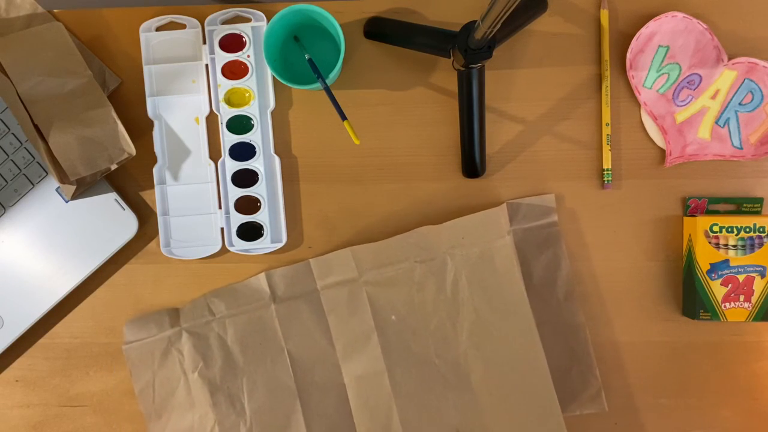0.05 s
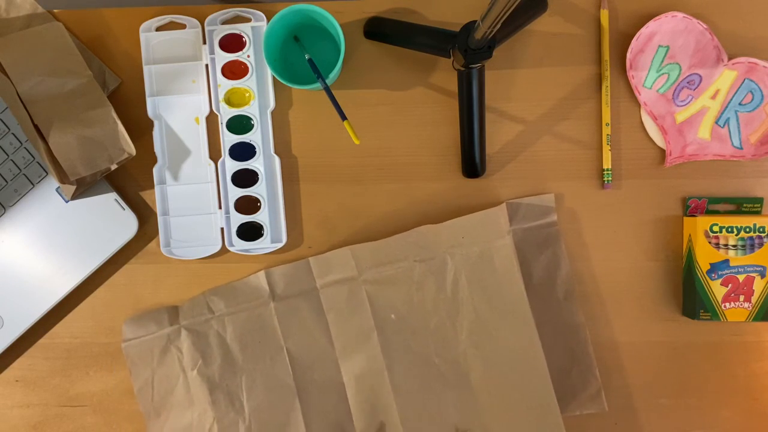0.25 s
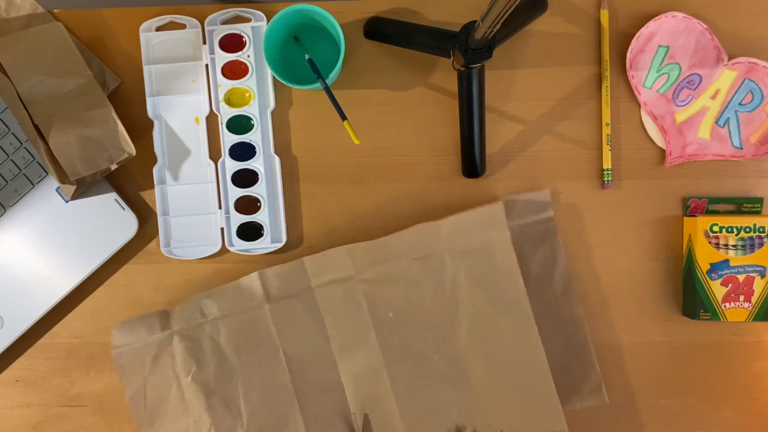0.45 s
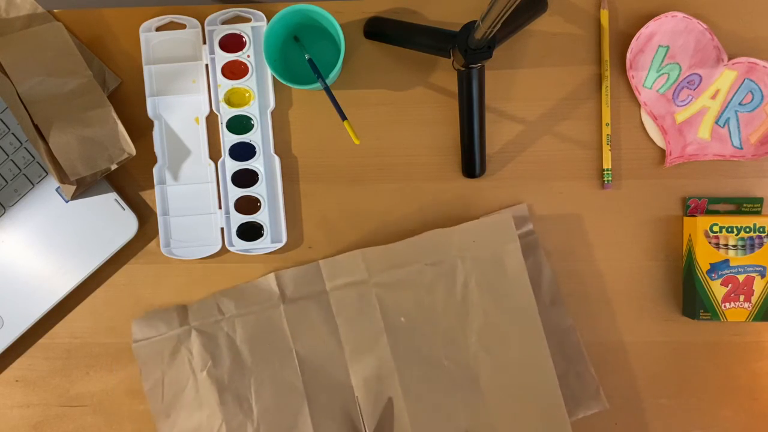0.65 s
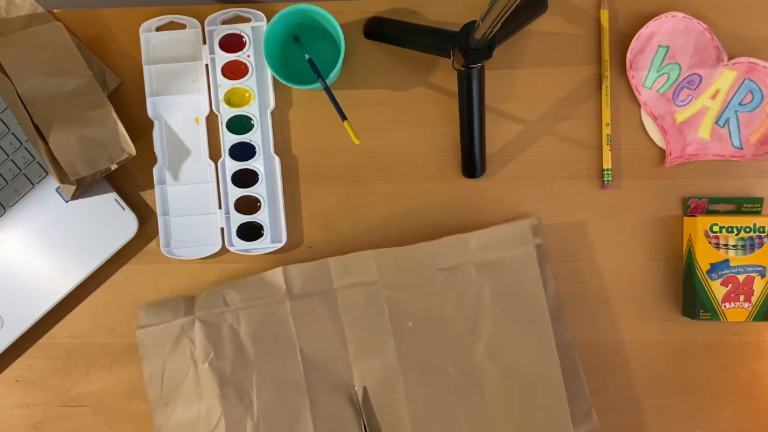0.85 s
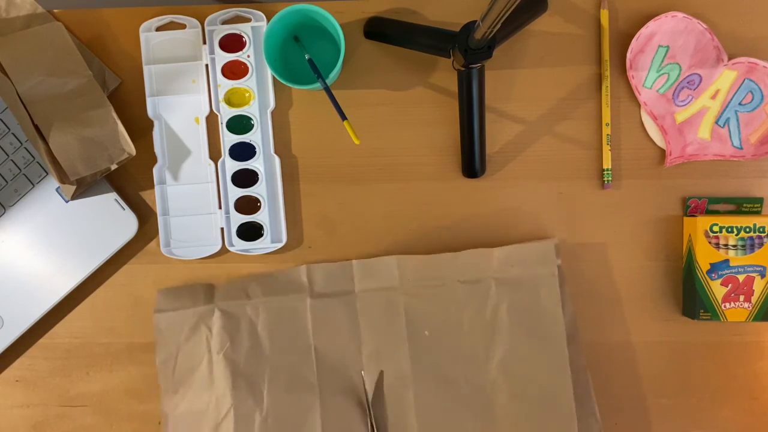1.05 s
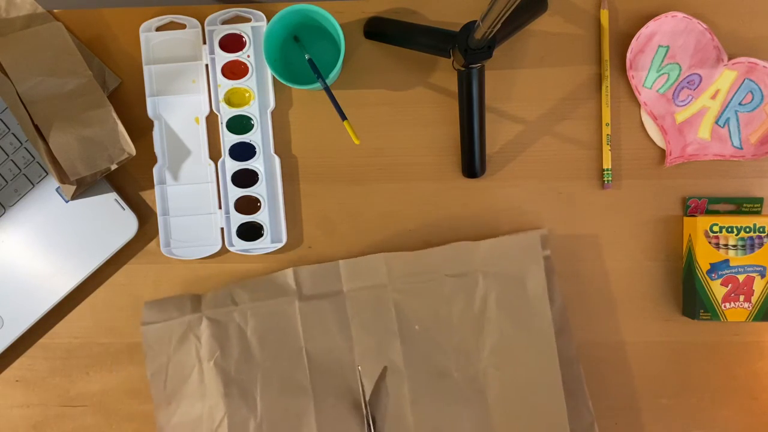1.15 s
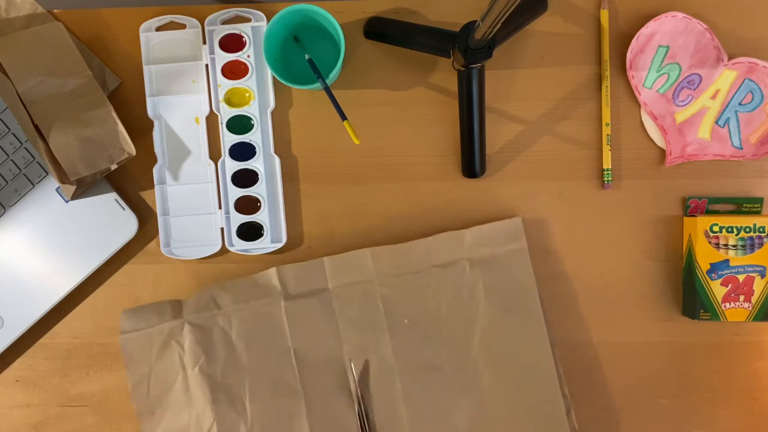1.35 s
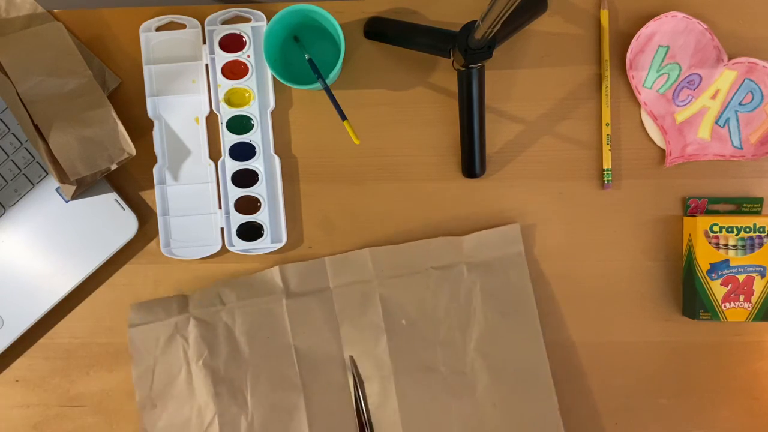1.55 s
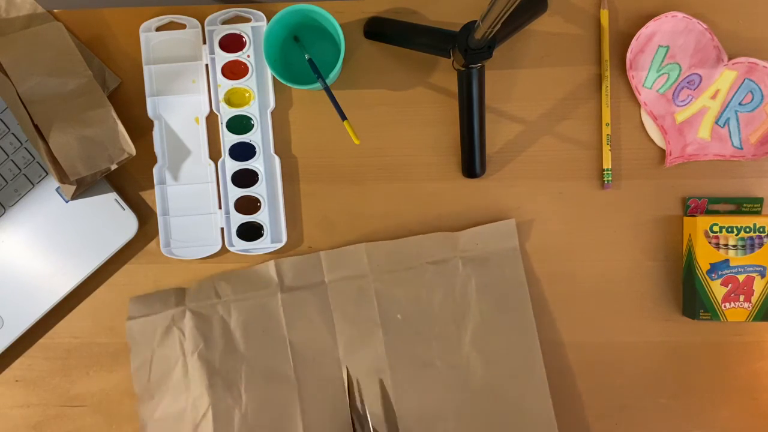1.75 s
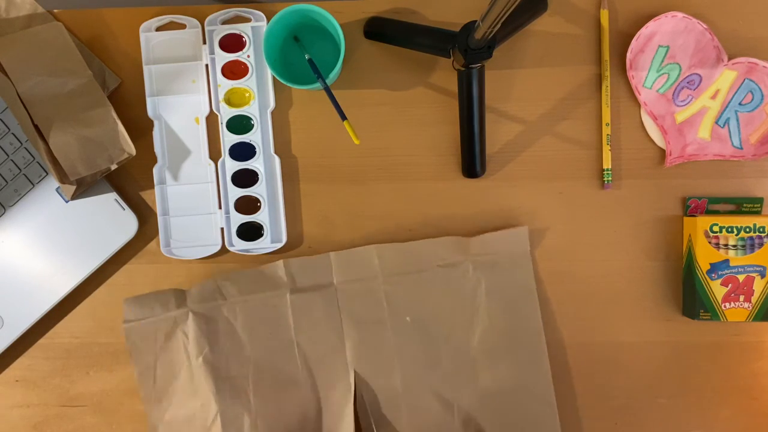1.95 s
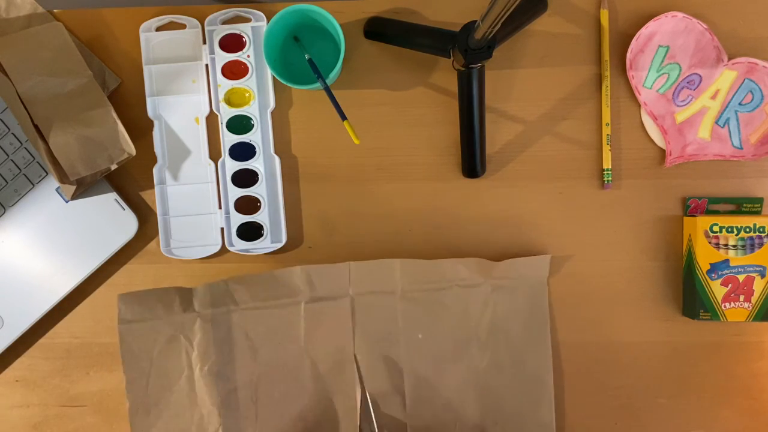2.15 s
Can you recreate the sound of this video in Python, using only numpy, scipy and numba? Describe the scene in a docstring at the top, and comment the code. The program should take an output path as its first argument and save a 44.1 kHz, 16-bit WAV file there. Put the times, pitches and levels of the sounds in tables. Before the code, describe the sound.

Crisp paper bag rustling in short strokes, followed by two scissor cuts, close in a quiet room

```python
"""A small quiet room with a wooden table, heard through two close microphone ports, over a faint low rumble.
A brown paper bag slides in five strokes by stick-slip friction, then shifts lightly in the hand.
Its creases snap by buckling, its flat sides pop, and the air inside resonates at about 1 kHz.
Scissors bite twice: fibres break one after another and the flap sinks in pitch; the steel blades tap.
The table hums under the rubbing and rings in a few low modes when the hand bumps it."""
import sys
import numpy as np
from scipy import signal
from scipy.fft import rfft, irfft, next_fast_len
from scipy.io import wavfile
from scipy.ndimage import uniform_filter1d, map_coordinates
from numba import njit

SR = 44100
rng = np.random.default_rng(int(sys.argv[2]) if len(sys.argv) > 2 else 0)


def waveform_to_disk(signal):
    """Save audio, clipped to [-1, 1], as 16-bit WAV at the path in sys.argv[1]."""
    frames = np.transpose(np.atleast_2d(signal))
    scaled = np.clip(frames, -1, 1) * 32767
    samples = np.round(scaled).astype(np.int16)
    wavfile.write(sys.argv[1], SR, samples)


N = 97020
T = np.arange(N) / SR
M = next_fast_len(N + SR // 2)  # padded transform length
HZ = np.fft.rfftfreq(M, 1 / SR)


def amp(db):
    """Level to amplitude ratio: 20 dB is a factor of ten."""
    return 10 ** (np.asarray(db) / 20)


def unit(x):
    """Normalization to an rms of 1."""
    return x / np.sqrt(np.mean(x ** 2) + 1e-20)


def along(points):
    """Logarithmic frequency interpolation of (Hz, value) points."""
    hz, value = np.transpose(points)
    return np.interp(np.log(HZ + 1), np.log(hz + 1), value)


def filtered(x, response):
    """Linear filtering: a product of spectra."""
    return irfft(rfft(x, M) * response, M)[..., :N]


def causal(gain):
    """Minimum phase: the folded cepstrum gives a causal response of unit power with this gain shape."""
    cepstrum = irfft(np.log(np.maximum(unit(gain), 1e-6)), M)
    cepstrum[1:M // 2] *= 2
    cepstrum[M // 2 + 1:] = 0
    return np.exp(rfft(cepstrum))


def colour(x, points):
    """Spectral envelope: shape x by relative (Hz, dB) points."""
    return filtered(x, causal(amp(along(points))))


def wobble(rate):
    """Random modulation: a smooth curve with rate knots a second."""
    return map_coordinates(rng.standard_normal(N // 8), [T * rate], mode="mirror")


def fade(t, t60):
    """Exponential damping: 60 dB down after t60 seconds."""
    return np.exp(-np.log(1000) * t / t60)


def signs():
    """Random polarity: two independent rows of plus and minus one."""
    return rng.choice([-1, 1], (2, N))


SLIP_SPREAD_DB, SHEET_T60_S, SHEET_RING = 5, 0.066, 1


def slips(rate):
    """Stick-slip friction: random ticks of uneven size, each followed by a decaying ring."""
    happens = rng.random(N) < rate / SR
    ticks = happens * amp(SLIP_SPREAD_DB * np.clip(rng.standard_normal(N), -2, 2))
    ring_power = signal.fftconvolve(ticks ** 2, fade(T[:SR // 10], SHEET_T60_S) ** 2)[:N]
    ring = np.sqrt(np.abs(ring_power))
    return unit((unit(ticks) + SHEET_RING * unit(ring)) * signs())


SNAP_RISE_S, SNAP_WINDOW_S = 0.00035, 0.0052


def burst(s, run, t60):
    """Buckling: noise builds up, holds while the crease runs, then decays; its energy is fixed."""
    t = np.maximum(T - s + SNAP_RISE_S / 2, 0)
    rise = np.minimum(t / SNAP_RISE_S, 1)
    x = rise * fade(np.maximum(t - SNAP_RISE_S - run, 0), t60) * signs()
    # As much energy as a signal of rms 1 lasting the window
    return x / np.linalg.norm(x, axis=1, keepdims=True) * np.sqrt(SNAP_WINDOW_S * SR)


def struck(blows, modes, rise):
    """Modal excitation: each blow rings the same damped sines, in the part shared by both ports."""
    out = np.zeros((2, N))
    for s, db in blows:
        t = np.maximum(T - s, 0)
        ring = sum(amp(db + g) * np.sin(2 * np.pi * hz * t) * fade(t, t60) for hz, g, t60 in modes)
        out[0] += (1 - np.exp(-t / rise)) * ring  # a soft contact builds up slowly
    return out


def resonant(x, modes):
    """Resonance: add narrow second-order band-passes to the direct sound."""
    peaks = sum(g * 1j * HZ * w / (c * c - HZ ** 2 + 1j * HZ * w) for c, w, g in modes)
    return filtered(x, 1 + peaks)


@njit
def resonator(x, poles):
    """Time-varying resonance: a complex pole that may move from sample to sample."""
    out, z = np.zeros(len(x)), 0j
    for i in range(len(x)):
        z = poles[i] * z + x[i]
        out[i] = z.real
    return out


def gliding(x, hz, width_hz):
    """Gliding resonance: ring x, at unit power gain, along a pitch curve."""
    radius = np.exp(-np.pi * width_hz / SR)
    poles = radius * np.exp(2j * np.pi * hz / SR)
    return np.sqrt(2 * (1 - radius * radius)) * np.array([resonator(row, poles) for row in x])


# Spectrum of the room's noise floor: pitch_hz, relative_level_db
FLOOR_COLOUR = [(15, -38), (28, -41), (40, -14.5), (56, 4), (85, -7.5), (150, -9.5), (300, -27), (700, -41),
                (3000, -29.5), (16000, -35.5)]
FLOOR_DB, FLOOR_SWELL_DB, FLOOR_SWELLS_PER_S = -66, 3, 9.9


def background():
    """Stationary noise with a modulated low band: the rumble wavers under a faint even hiss."""
    swell = unit(amp(FLOOR_SWELL_DB * wobble(FLOOR_SWELLS_PER_S)))
    noise = rng.standard_normal((2, N))
    low = 1 / (1 + (HZ / 200) ** 4)
    mixed = filtered(noise * swell, low) + filtered(noise, 1 - low)
    return amp(FLOOR_DB) * colour(mixed, FLOOR_COLOUR)


# Low rub against the table: time_s, relative_level_db
RUB_LEVEL = [(.12, -74), (.33, -56), (.46, -69), (.53, -49), (.66, -52.5), (.72, -59.5), (.78, -52.5),
             (.96, -49.5), (1.11, -58), (1.17, -71), (1.33, -61), (1.431, -54.5), (1.57, -62.5),
             (1.63, -61), (1.8, -57), (1.88, -51), (2.0, -67), (2.2, -57.5)]
# Spectrum of the rubbed wood: pitch_hz, relative_level_db
WOOD_COLOUR = [(60, -7), (120, -5), (170, -11), (300, 2), (400, -7), (520, -5.5), (700, -10), (1400, -5.5),
               (4000, -102)]
# The hand bumps the table: start_s, relative_level_db
HAND_BUMPS = [(.442, -54.5), (1.845, -53), (1.876, -43.5)]
# Modes of the table top: pitch_hz, relative_level_db, t60_s
TABLE_TOP_MODES = [(118.6, 8, 0.093), (179, 2.5, 0.074), (252, 0, .085), (360, -33, 0.052)]
RUB_DB, RUB_SLIPS_PER_S, BUMP_RISE_S = -5, 490, 0.0036


def table():
    """Forced and free vibration: the table top hums under rubbing and thuds when bumped."""
    s, level = np.transpose(RUB_LEVEL)
    rub = slips(RUB_SLIPS_PER_S) * amp(RUB_DB + np.interp(T, s, level))
    return colour(rub, WOOD_COLOUR) + struck(HAND_BUMPS, TABLE_TOP_MODES, BUMP_RISE_S)


# The steel blades touch: start_s, relative_level_db
BLADE_TOUCHES = [(1.308, -33.5), (1.841, -51)]
# Modes of the blades: pitch_hz, relative_level_db, t60_s
BLADE_MODES = [(4700, -25, 0.055), (5600, -12, .03), (7200, -22, .025), (9180, 7, 0.018), (9300, 0, 0.04),
               (11500, 9, 0.0052)]


def blade_taps():
    """Free vibration of steel: a hard contact rings high damped modes."""
    return struck(BLADE_TOUCHES, BLADE_MODES, rise=.0001)


# Cuts: start_s, length_s, relative_level_db at the start, flap start_pitch_hz, flap end_pitch_hz
BITES = [(1.599, .2, -44, 858, 604), (1.85, 0.1, -45.5, 880, 805)]
# Spectrum of the sheared fibres: pitch_hz, relative_level_db
SHEAR_COLOUR = [(100, -16), (330, -9.5), (460, -11.5), (600, -15), (780, -14), (1300, -7), (2300, -8),
                (5000, -16.5), (15000, -37)]
CUT_FADE_DB, FIBRES_PER_S, FLAP_WIDTH_HZ, FLAP_DB = 17.5, 490, 60, -5


def scissors():
    """Progressive fracture: fibres break ever more weakly; the flap sinks in pitch as the slit grows."""
    out = np.zeros((2, N))
    for s, length, db, start_hz, end_hz in BITES:
        closed = np.clip((T - s) / length, 0, 1)
        force = amp(db - CUT_FADE_DB * closed) * ((T > s) & (T < s + length))
        pitch = start_hz + (end_hz - start_hz) * closed
        flap = gliding(force * slips(FIBRES_PER_S), pitch, FLAP_WIDTH_HZ)
        out += colour(force * slips(FIBRES_PER_S), SHEAR_COLOUR) + amp(FLAP_DB) * flap
    return out


# The flat of the bag pops, dull, and a few low dull knocks sound the same way: start_s, relative_level_db,
# pitch_hz
PANEL_POPS = [(.517, -48, 350), (1.213, -44.5, 1270), (1.261, -36, 1120), (1.297, -38.5, 1190),
              (1.380, -37, 1510), (1.492, -39, 1470), (1.615, -43, 1230), (1.625, -40.5, 880),
              (1.841, -28.5, 1270), (1.846, -42, 345), (1.8745, -32.5, 1270), (1.875, -43.5, 470),
              (1.881, -48, 1240), (1.907, -49, 565), (2.087, -37, 1330), (2.095, -51, 480),
              (2.165, -46, 1080)]
POP_OCTAVES, POP_SKIRT_DB = 0.19, -15.5  # width of the resonance and level of its broad skirt
POP_PUSH, POP_RING, POP_HOLD_S, POP_T60_S = 0.57, 0.62, 0.0023, 0.008


def pops():
    """Snap-through: a panel flips over, one push and a short flutter exciting a broad resonance; the low knocks
    are played the same way."""
    out = np.zeros((2, N))
    for s, db, hz in PANEL_POPS:
        octaves = np.log2((HZ + 1) / hz)
        peak = np.exp(-.5 * (octaves / POP_OCTAVES) ** 2)
        skirt = amp(POP_SKIRT_DB) / (1 + (octaves / 1.56) ** 4)
        push = POP_RING * burst(s, POP_HOLD_S, POP_T60_S)
        push[0, round(s * SR)] += POP_PUSH * np.sqrt(SNAP_WINDOW_S * SR)
        out += amp(db) * filtered(push, causal(peak + skirt))
    return out


# Level of the bag's hollow resonance near 1 kHz: time_s, relative_level_db
HOLLOW_CURVE = [(.1, -5.5), (.22, -10.5), (.28, -3.5), (.36, 3.5), (.47, -5), (.53, -2.5), (.58, -12),
                (.70, -25), (.76, -7), (.82, 4.5), (.9, 7.5), (.97, 2.5), (1.05, -9.5), (1.2, 6),
                (1.34, -3), (1.49, -0.5), (1.66, -8), (2.05, 8)]
# Spectrum of the hollow: pitch_hz, relative_level_db
HOLLOW_COLOUR = [(300, -33), (720, -24), (900, -8), (1080, -3), (1400, -3.5), (1650, -8.5), (2100, -5),
                 (4000, -42.5)]


def hollow(x):
    """Cavity resonance: the air in the bag answers more or less as it opens and flattens."""
    return colour(x * amp(np.interp(T, *np.transpose(HOLLOW_CURVE))), HOLLOW_COLOUR)


# Creases snap: start_s, relative_level_db, treble_over_body_db, run_s along the crease,
# t60_s of flex and facet, pitch_hz of the facet
CREASE_SNAPS = [(.121, -55.5, -2, 0.0014, 0.012, 2520), (.184, -45, -3, 0.00056, 0.0086, 2720),
                (0.478, -38.5, -3.5, 0.0023, .01, 2270), (0.516, -40, -5, 0.0025, .014, 1630),
                (0.568, -36, -16, 0.003, 0.0077, 2280), (0.603, -39.5, 4.5, .001, 0.0064, 2300),
                (.611, -37.5, 0, 0.0012, .006, 2380), (.649, -37, -1.5, 0.0013, 0.0087, 2230),
                (0.652, -37.5, 0, 0.0025, 0.0081, 2500), (0.667, -39.5, -10, 0.0021, 0.0087, 2700),
                (0.708, -33.5, -1, 0.0026, 0.017, 2610), (.745, -43.5, 3, 0.0011, 0.0041, 2700),
                (0.755, -30, -4, 0.0013, 0.011, 2430), (0.877, -45, -1, 0.0023, 0.018, 1130),
                (0.882, -44.5, 6.5, 0.0044, 0.0076, 2360), (0.902, -43, 7.5, 0.0032, 0.009, 1120),
                (.930, -49, 9.5, 0.0028, .013, 2480), (0.9696, -41, 5, 0.0024, .01, 1110),
                (1.041, -45, -2, 0.0023, 0.012, 2220), (1.048, -37, -7, .004, 0.013, 2480),
                (1.065, -43.5, 4.5, 0.00063, 0.0061, 2430), (1.2618, -44, -6.5, 0.0018, .008, 4240),
                (1.298, -38, -6, 0.0032, 0.011, 2370), (1.3071, -37, 10.5, 0.0019, .01, 5340),
                (1.316, -41, -7, .001, 0.0098, 2290), (1.3531, -35.5, 1, 0.0015, .008, 3300),
                (1.425, -34.5, -7.5, 0.0074, 0.014, 2300), (1.442, -40.5, -6, 0.0032, .01, 2470),
                (1.452, -44, 1, 0.0054, .012, 3930), (1.4908, -38, -14, 0.0034, 0.0087, 2290),
                (1.503, -45.5, -13, .002, 0.0083, 2350), (1.535, -46, -2, 0.0024, .012, 2360),
                (1.601, -33.5, -3.5, 0.0073, 0.013, 3180), (1.665, -35, -2, 0.0015, 0.052, 2090),
                (1.745, -42, -9, 0.0028, 0.028, 2800), (1.8396, -31.5, -3, 0.0038, 0.0082, 2110),
                (1.9059, -39, -11, .005, 0.014, 2440), (1.944, -52.5, 6, 0.0027, 0.031, 4660),
                (2.088, -47, -24, 0.0039, 0.023, 2120)]
FACET_DB, FACET_Q = -4.5, 13.5


def facets():
    """Plate resonance: the small stiff facet beside each crease rings at its own pitch."""
    out = np.zeros((2, N))
    for s, db, bright, run, t60, hz in CREASE_SNAPS:
        b, a = signal.iirpeak(hz, FACET_Q, SR)
        ring = signal.lfilter(b, a, burst(s, run, t60))
        # The narrower the peak, the more gain keeps its power
        out += amp(db + FACET_DB) * np.sqrt(FACET_Q * SR / (np.pi * hz)) * ring
    return out


# Spectrum of the flexing sheet: pitch_hz, relative_level_db
FLEX_COLOUR = [(200, -28.5), (700, -38), (1400, -10.5), (2300, -1), (3100, -8), (5000, -10), (9000, -43)]
# Spectrum of the treble crack: pitch_hz, relative_level_db
CRACK_COLOUR = [(1500, -23), (3300, 5.5), (5000, 6), (6500, 4), (8400, -1), (11000, 5), (16000, -16.5)]
SNAP_DB, SNAP_HOLLOW_DB, CRACK_T60_RATIO = -2.5, -3.5, 0.39


def creases():
    """Elastic instability: each snap flexes the sheet, stirs the hollow and cracks in the treble."""
    flex = sum(amp(db) * burst(s, run, t60) for s, db, bright, run, t60, hz in CREASE_SNAPS)
    air = sum(amp(db) * burst(s, run, t60) for s, db, bright, run, t60, hz in CREASE_SNAPS)
    crack = sum(amp(db + bright) * burst(s, run, CRACK_T60_RATIO * t60)
                for s, db, bright, run, t60, hz in CREASE_SNAPS)
    body = amp(SNAP_DB) * colour(flex, FLEX_COLOUR)
    return body + colour(crack, CRACK_COLOUR) + amp(SNAP_HOLLOW_DB) * hollow(air)


CRINKLE_T60_S = 0.0023


def crinkles(rate):
    """Random impulse process: sparse little buckles, each decaying quickly."""
    ticks = (rng.random(N) < rate / SR) * rng.random(N)
    return unit(signal.fftconvolve(ticks, fade(T[:SR // 10], CRINKLE_T60_S))[:N] * signs())


# The sheet's main resonance as the paper bends: time_s, pitch_hz, relative_level_db
BEND_CURVE = [(.16, 2480, -7.5), (.235, 2520, -16), (.275, 1690, -5), (.36, 1670, -14.5), (0.481, 1410, -1),
              (.55, 2280, -13), (.62, 2270, -5), (.68, 2600, -3), (.79, 2500, -3), (.86, 2430, -0.5),
              (.95, 2430, -2.5), (1.06, 2370, -8), (1.3, 2300, -8), (1.39, 1820, -8), (1.46, 2230, -11)]
BEND_WIDTH_HZ, BEND_LOW_HZ, CATCHES_PER_S = 200, 1100, 1100


def bending(friction):
    """Stick-slip into a moving resonance: the sheet catches, lets go and rings as it bends."""
    s, hz, level = np.transpose(BEND_CURVE)
    high_pass = 1 / (1 + (BEND_LOW_HZ / (HZ + 1)) ** 4)
    catches = crinkles(CATCHES_PER_S) * friction * amp(np.interp(T, s, level))
    return gliding(filtered(catches, high_pass), np.interp(T, s, hz), BEND_WIDTH_HZ)


# One list for each slide of the bag: time_s, relative_friction_level_db, hiss_over_body_db
STROKES = [
    [(.105, -73, -20), (.16, -52, -10.5), (.205, -39.5, -9.5), (.255, -36, -10), (.275, -32, -6.5),
     (.352, -38.5, -9.5), (.378, -60, -15), (.44, -58, -1)],
    [(.44, -76, 10), (.468, -43, -8), (.479, -38.5, -7.5), (.497, -50.5, -5), (.57, -36.5, -8),
     (.62, -37, -10.5), (.66, -42, -21), (.69, -51.5, -11.5), (.745, -73, 4)],
    [(.755, -29, -9.5), (.80, -29.5, -5), (.828, -33.5, 3.5), (.838, -36, -8), (.852, -37.5, 7.5),
     (.874, -54.5, 4.5), (.92, -53, -7)],
    [(.922, -45, -5), (.965, -37.5, -8.5), (.985, -47.5, -3), (1.025, -41.5, -6), (1.052, -38, -16),
     (1.08, -52.5, -3), (1.15, -59.5, 2), (1.25, -65.5, -0.5)],
    [(1.291, -47, 5), (1.301, -39, 2.5), (1.322, -42, -0.5), (1.385, -42, 2.5), (1.415, -48.5, -1.5),
     (1.455, -51, 3.5), (1.475, -55, -6), (1.57, -57.5, 5)],
]
# The bag shifts lightly in the hand: time_s, relative_friction_level_db, hiss_over_body_db
HAND_SHIFT = [(1.57, -54.5, 4), (1.66, -57, 5), (1.72, -67.5, 8), (1.82, -61.5, 3), (1.88, -53, -12),
              (1.98, -63.5, 8.5), (2.07, -58, 3.5), (2.14, -65.5, 5.5), (2.2, -62.5, 7)]
# Spectrum of the rubbed sheet: pitch_hz, relative_level_db
BODY_COLOUR = [(300, -55), (900, -32.5), (1500, -6), (2050, -0.5), (2550, -0.5), (2820, 1), (3060, -5.5),
               (3500, -5), (4500, -4.5), (9000, -23.5)]
# Spectrum of the bright hiss: pitch_hz, relative_level_db
HISS_COLOUR = [(1500, -21), (3200, 5), (5000, 7.5), (6500, 6), (8400, 5), (10500, 3), (14300, 2),
               (16000, -13.5)]
SLIDE_DB, SLIDE_HOLLOW_DB, SLIPS_PER_S = -3.5, -6.5, 4000
JUDDER_DB, JUDDER_PER_S, CRINKLES_PER_S, CRINKLE_DB = 1.15, 170, 200, -13


def sliding():
    """Friction-driven radiation: slips drive the sheet, the bag's hollow and a bright hiss."""
    body, hiss = np.zeros(N), np.zeros(N)
    for stroke in STROKES + [HAND_SHIFT]:
        s, level, bright = np.transpose(stroke)
        moving = 1. * ((T >= s[0]) & (T <= s[-1]))
        gain = amp(np.interp(T, s, level)) * uniform_filter1d(moving, size=90)  # 2 ms edges
        body += gain
        hiss += gain * amp(np.interp(T, s, bright))
    judder = amp(JUDDER_DB * wobble(JUDDER_PER_S))
    grit = slips(SLIPS_PER_S) * judder + amp(CRINKLE_DB) * crinkles(CRINKLES_PER_S)
    sheet = amp(SLIDE_DB) * colour(grit * body, BODY_COLOUR) + bending(body)
    air = amp(SLIDE_HOLLOW_DB) * hollow(slips(SLIPS_PER_S) * judder * body)
    return sheet + colour(grit * hiss, HISS_COLOUR) + air


def tail(t60):
    """Diffuse reverberation: two decaying noise tails of energy 1."""
    h = rng.standard_normal((2, SR // 2)) * fade(T[:SR // 2], t60)
    return h / np.linalg.norm(h, axis=1, keepdims=True)


# Phase by which the left port leads: pitch_hz, phase_rad
LEFT_LEAD = [(100, 0), (1300, -.5), (2000, -1.15), (2600, -1.25), (4000, -2.7), (6100, -2.5), (6800, -.9),
             (8500, .3), (9800, 2.7), (10550, 3.14), (11200, 3.5), (11900, 4.6), (12600, 6.1), (13500, 6.6),
             (14300, 7.9), (14700, 9), (15700, 9.4)]
# Left minus right level: pitch_hz, difference_db
LEFT_OVER_RIGHT = [(60, -2), (110, 4), (200, -4.5), (380, 2), (700, -5), (1290, -3), (2380, 1), (4400, -4),
                   (8120, -1.0), (15000, 1)]
# Likeness of the two ports: pitch_hz, coherence (0 to 1)
COHERENCE = [(60, .92), (400, .85), (680, .5), (1000, .95), (2500, .95), (3500, .5), (6000, .6),
             (8000, .92), (10500, .98), (15000, .92)]


def ports(x):
    """Interchannel coherence: a shared and an unshared part reach the ports, shifted in phase and level."""
    turn = np.arccos(np.clip(along(COHERENCE), 0, 1)) / 2
    shared, unshared = filtered(x, np.array([np.cos(turn), np.sin(turn)]))
    half = amp(along(LEFT_OVER_RIGHT) / 2) * np.exp(.5j * along(LEFT_LEAD))
    return filtered(np.array([shared + unshared, shared - unshared]), np.array([half, 1 / half]))


# Narrow resonances of the bag: pitch_hz, width_hz, gain
BAG_RESONANCES = [(974, 18, 0.94), (1141, 60, 0.9), (1320, 14, 0.28), (1551, 19, 0.73), (2246, 22, 0.33),
                  (2517, 22, 0.17), (2580, 25, .3), (2930, 24, 0.4), (3310, 160, 0.33), (5450, 49, 0.11),
                  (8430, 98, 0.48)]
# Low flapping resonances of the bag's whole side: pitch_hz, width_hz, gain
SIDE_RESONANCES = [(303, 14, 0.3), (371, 13, 0.98)]
ROOM_T60_S, ROOM_DB, POP_ROOM_DB = 0.088, -7, -6.5


def scene():
    """Superposition: direct sounds through their resonances, their reverberation and the noise floor."""
    paper = resonant(sliding() + creases() + facets(), BAG_RESONANCES)
    direct = paper + resonant(scissors() + table(), SIDE_RESONANCES) + blade_taps()
    popped = pops()
    sent = amp(ROOM_DB) * direct + amp(POP_ROOM_DB) * popped
    room = signal.fftconvolve(sent, tail(ROOM_T60_S), axes=1)[:, :N]
    return ports(direct + popped + room + background())


TOP_HZ = 15850


def record(dry):
    """Band limiting: nothing is kept at or above the top frequency."""
    return filtered(dry, HZ < TOP_HZ)


dry = scene()
out = record(dry)
waveform_to_disk(out)
```